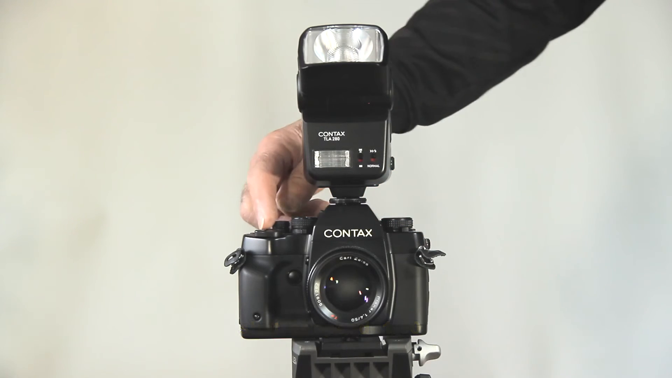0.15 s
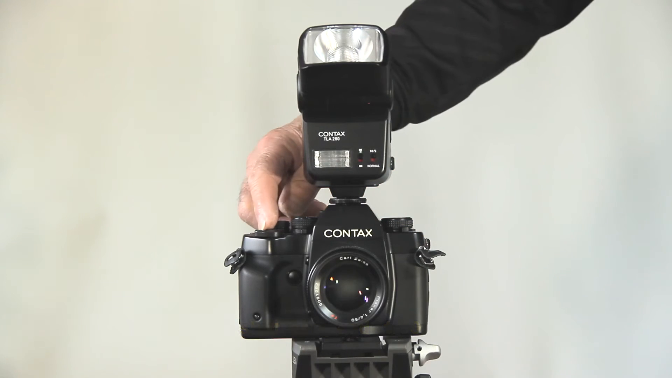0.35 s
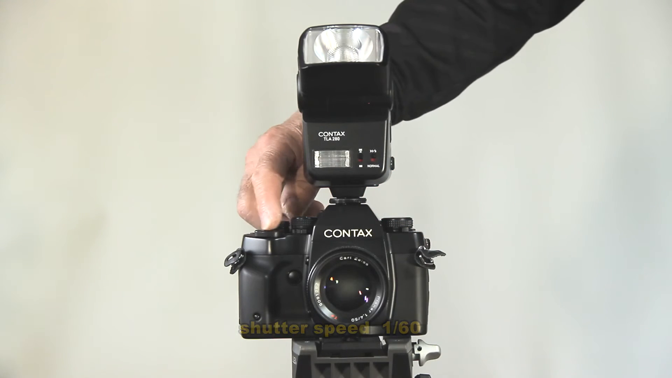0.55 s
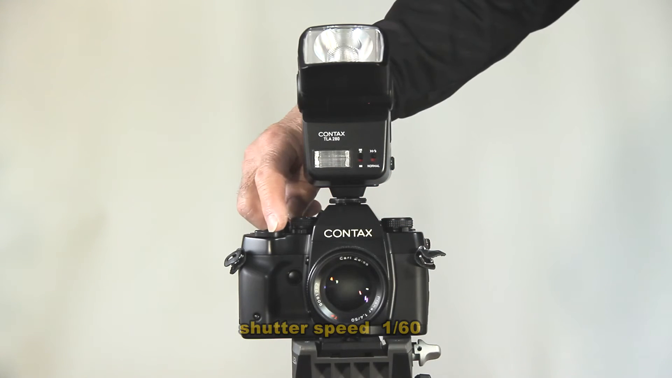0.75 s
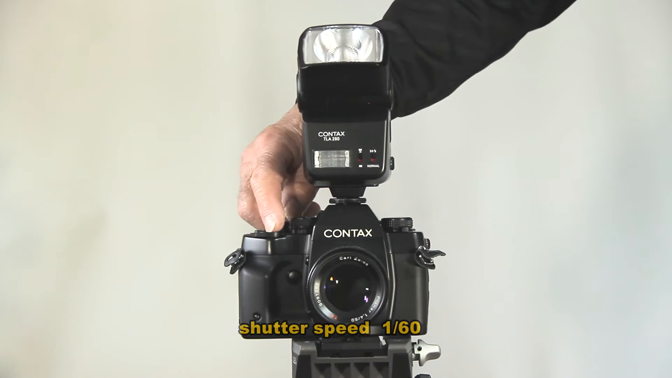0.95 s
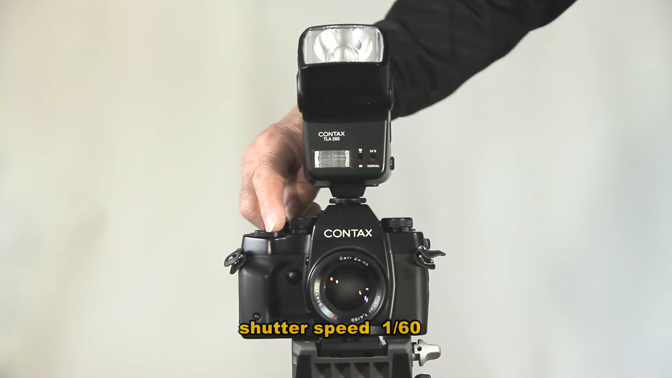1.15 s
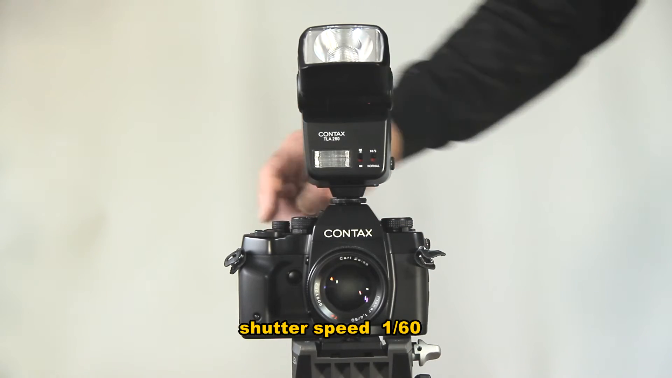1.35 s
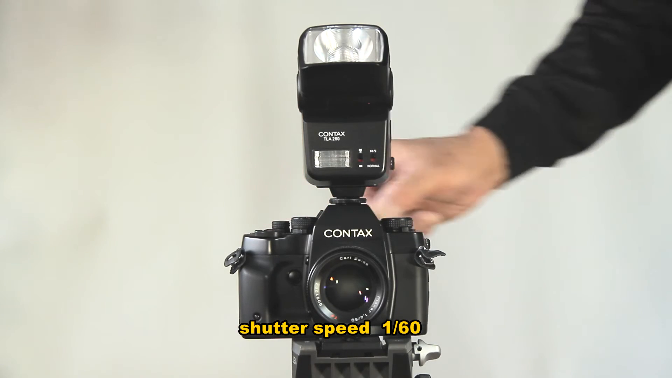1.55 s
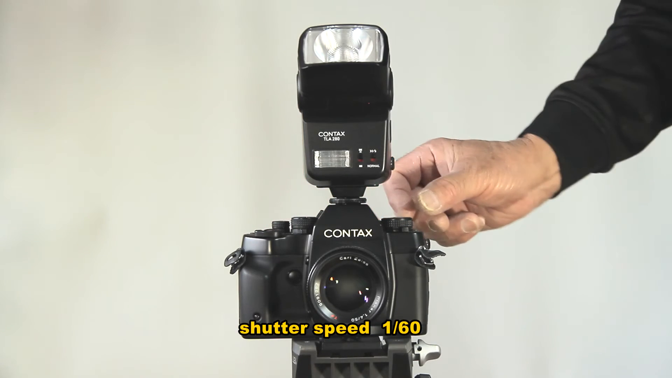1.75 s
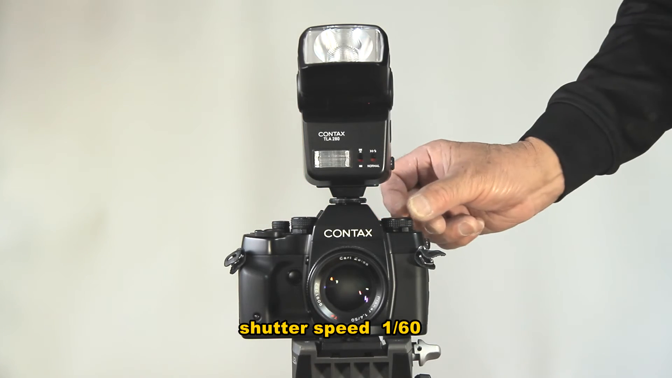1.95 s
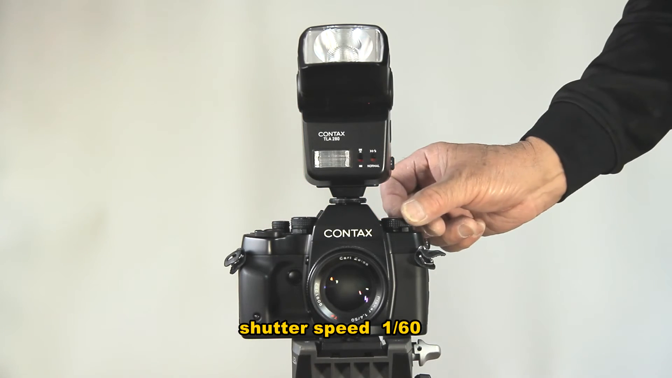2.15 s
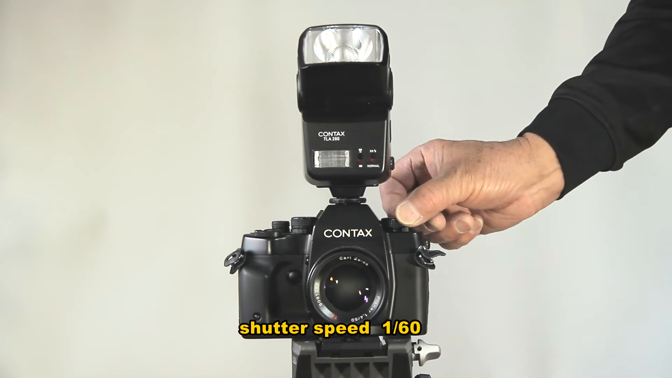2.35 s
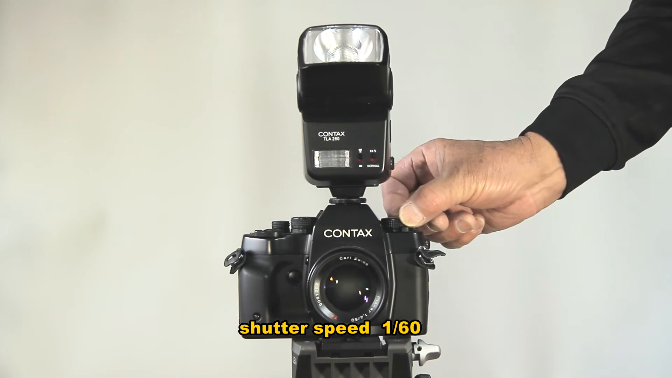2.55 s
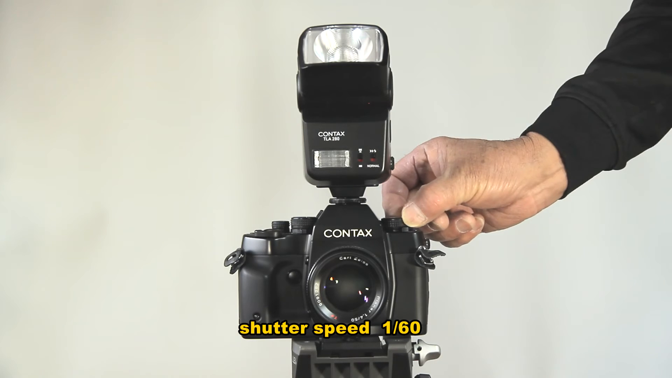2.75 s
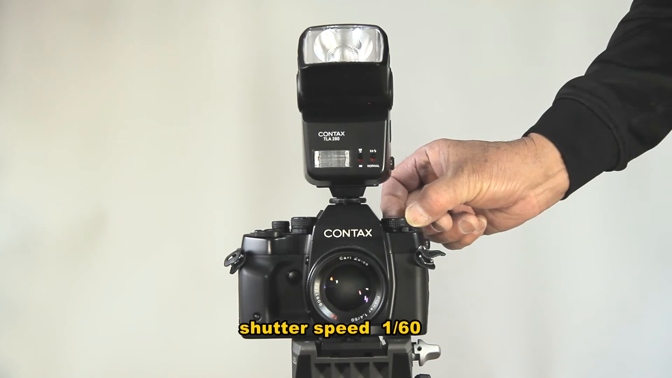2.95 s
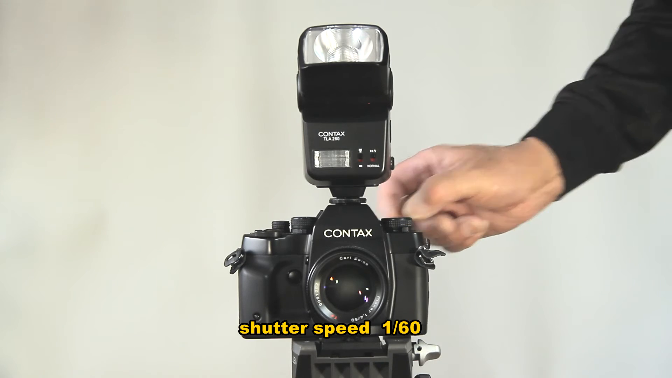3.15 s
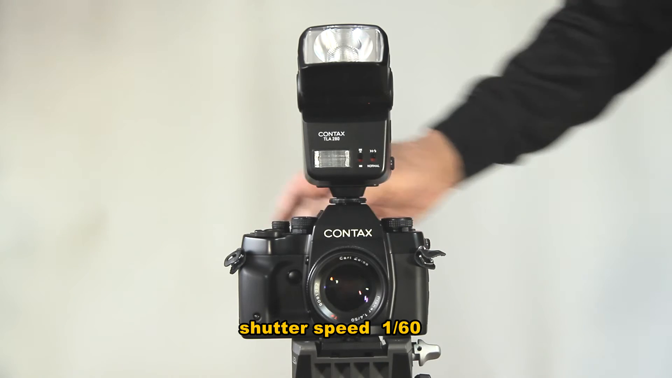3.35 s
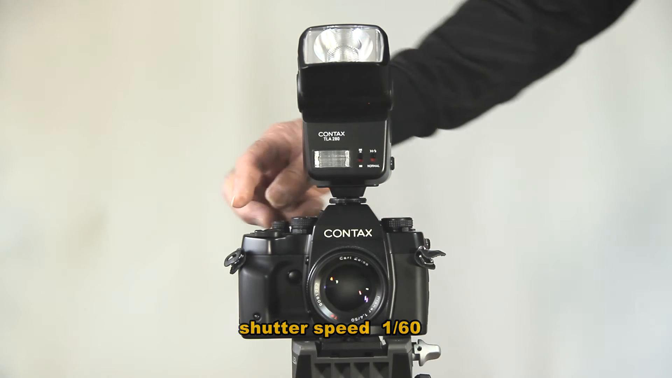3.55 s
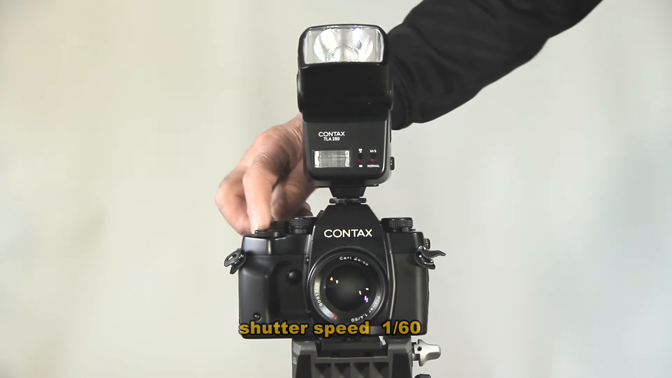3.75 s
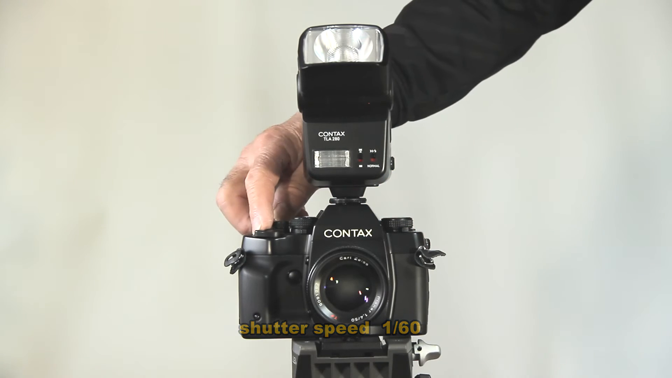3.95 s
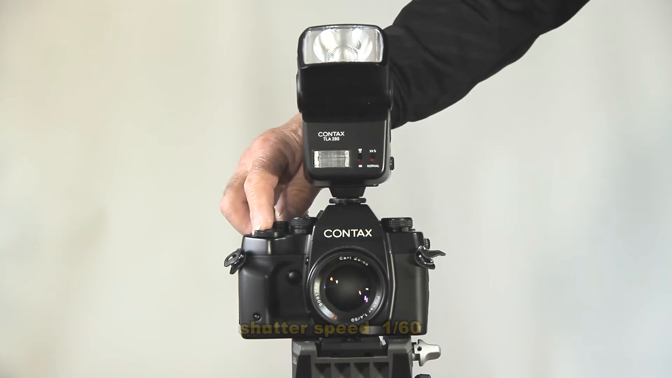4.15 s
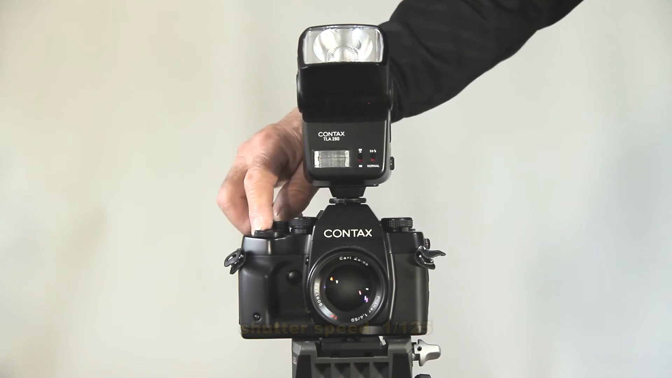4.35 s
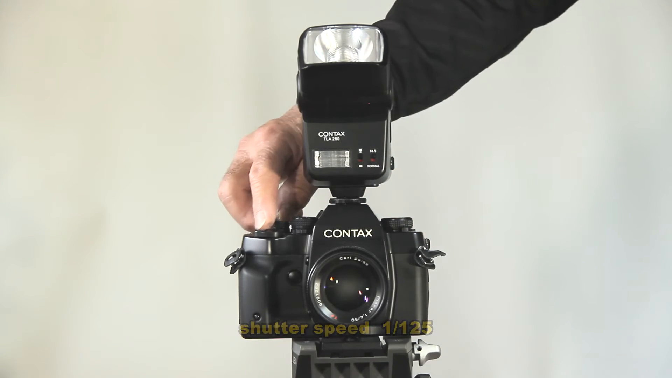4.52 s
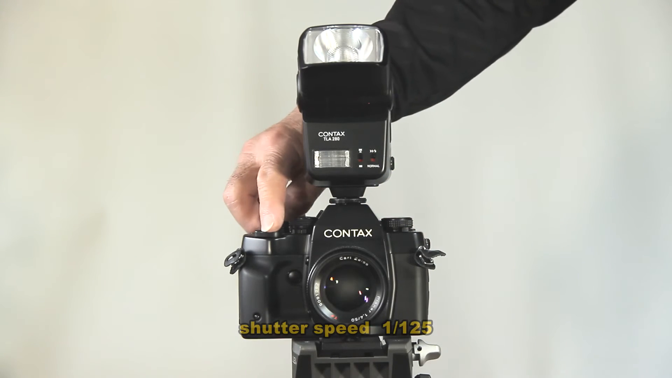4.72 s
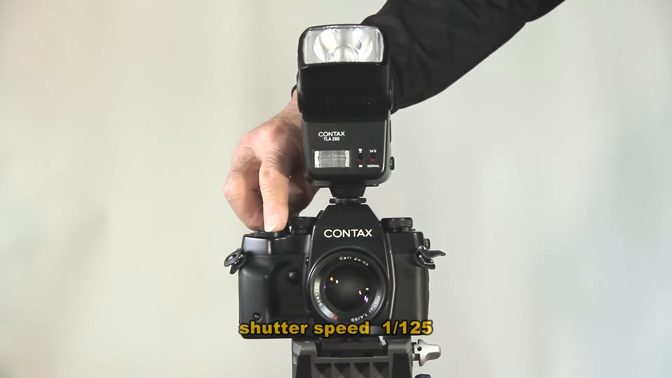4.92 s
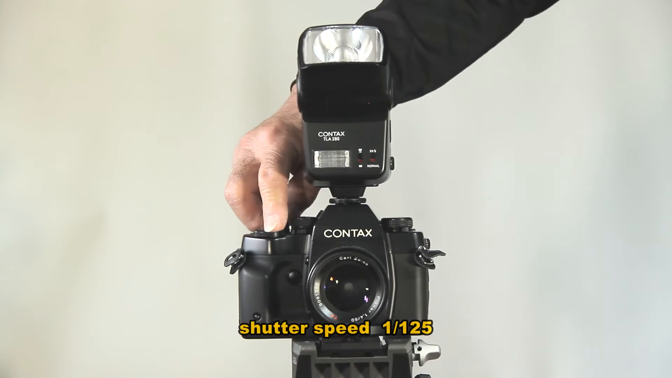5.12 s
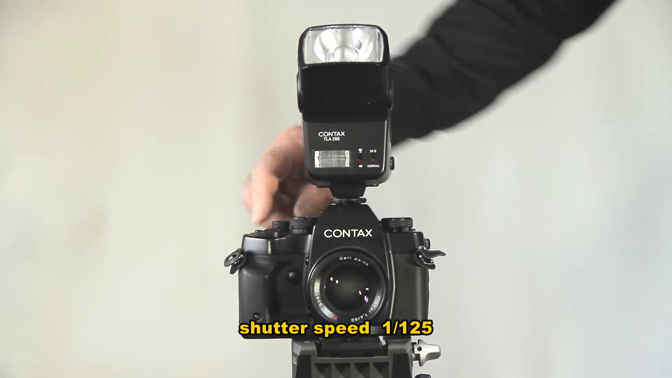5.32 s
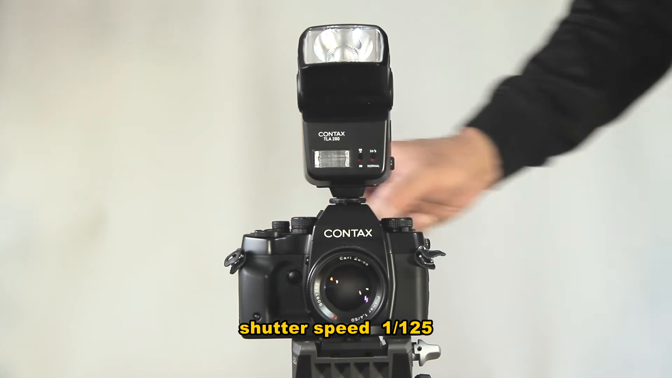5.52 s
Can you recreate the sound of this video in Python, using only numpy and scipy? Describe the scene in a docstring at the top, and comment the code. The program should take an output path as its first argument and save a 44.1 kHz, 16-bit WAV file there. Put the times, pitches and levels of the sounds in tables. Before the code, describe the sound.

In a small room with a firm low mains hum, faint fan tones and soft hiss, faint dial clicks lead to a loud camera shot: snap, mirror slap, shutter clatter and a brief geared motor whine. Quiet clicks and bumps of the hand follow, then a second similar shot. Close microphone, short room echoes.

```python
"""A steady mains hum with fan tones and hiss fills a small room, and a hand clicks the camera's dials.
Then a motor-driven film SLR on a tripod fires, with more clicks before it fires once again.
In each shot the release snaps, the mirror slaps up, the curtains run, the mirror drops and a geared motor
winds the film. Blows are noise bursts with ringing modes, travel is dense ticks, the whine is gear partials.
Soft rubs and bumps of the hand join in, and the room adds short echoes."""
import sys
import numpy as np
from scipy import signal
from scipy.fft import rfft, irfft
from scipy.io import wavfile

SR = 44100
rng = np.random.default_rng(int(sys.argv[2]) if len(sys.argv) > 2 else 0)


def master_out(mix):
    """Clip the mix to full scale and print it as 16-bit PCM to the path in sys.argv[1]."""
    frames = np.transpose(np.atleast_2d(mix))
    ceiling = np.clip(frames, -1, 1)
    pcm = np.round(ceiling * 32767).astype(np.int16)
    wavfile.write(sys.argv[1], SR, pcm)


N = 250488
TIME = np.arange(N) / SR

# When the parts of the camera act. Each row is one shot: the times in seconds of release, mirror up,
# curtain, mirror down and cocking.
SHOTS = [(.872, 0.9164, .9664, 1.0557, 1.079), (4.9202, 4.9613, 5.014, 5.095, 5.124)]
# How hard they act. Each row is one shot: the force in dB of the same five stages.
FORCES_DB = [(0, 0, 3, 2.1, -0.28), (0, 0.52, 1.5, 3, -2.64)]


def amp(db):
    """Turns decibels into gain."""
    return 10 ** (np.asarray(db) / 20)


def unit(x):
    """Scales a sound to rms 1."""
    return x / np.sqrt(np.mean(x ** 2) + 1e-20)


def read(points, hz):
    """Reads a table between its points on a log-frequency axis."""
    f, value = np.transpose(points)
    return np.interp(np.log(hz + 1), np.log(f + 1), value)


def add(mix, s, sound):
    """Mixes a sound in at time s, in seconds."""
    part = mix[round(s * SR):][:len(sound)]
    part += sound[:len(part)]


def tint(x, colour, weight_db=0, corner_hz=3000):
    """Gives x a spectrum, raised or cut by weight_db below the corner, and scales it to rms 1."""
    hz = np.fft.rfftfreq(len(x), 1 / SR)
    shelf_db = weight_db / (1 + (hz / corner_hz) ** 4)
    gain = amp(read(colour, hz) + shelf_db)
    return unit(irfft(rfft(x) * gain, len(x)))


def wander(size, rate_hz):
    """Smooth random motion of rms 1, with little above rate_hz."""
    hz = np.fft.rfftfreq(size, 1 / SR)
    spectrum = rfft(rng.standard_normal(size))
    return unit(irfft(spectrum / (1 + (hz / rate_hz) ** 4), size))


def ticks(size, per_s, spread_db):
    """A dense train of tiny contacts of uneven strength, each a quickly dying puff of noise."""
    strength = amp(spread_db * np.minimum(rng.exponential(1, size), 4)) * rng.choice([-1, 1], size)
    train = strength * (rng.random(size) < per_s / SR)
    scrape = rng.standard_normal(size)
    decay_s = 0.000283  # decay time of the power
    power = signal.lfilter([1], [1, -np.exp(-1 / (decay_s * SR))], train ** 2)
    return scrape * np.sqrt(power)


def crack(colour, weight_db, snap_s, after_db, after_s, size=4096):
    """Hard parts meet: a snap of about a millisecond, then noise, like many close modes, dying fast."""
    t = np.arange(size) / SR
    shape = np.exp(-(t / snap_s) ** 2) + amp(after_db) * np.exp(-t / after_s)
    onset = 1 - np.exp(-t / 0.0001256)
    return tint(rng.standard_normal(size), colour, weight_db) * shape * onset


def cycle(table):
    """Plays a table of one cycle in every shot: yields (s, force in dB, the rest of the row)."""
    # The names of the five stages, in the order in which the shots list them.
    stages = ("release", "mirror up", "curtain", "mirror down", "cocking")
    for times, forces_db in zip(SHOTS, FORCES_DB):
        for stage, delay_s, *rest in table:
            k = stages.index(stage)
            yield times[k] + delay_s, forces_db[k], *rest


def background():
    """Even hiss and rumble from shaped noise, a firm mains hum and fan tones that waver in pitch and level."""
    # Steady tones of the room, mains hum first, then a fan. Each row: frequency in Hz, rms level in dB.
    tones = [(120, -45.5), (151, -58.5), (249, -57), (282, -61), (458, -75), (1200, -59.5), (1404, -61),
             (1696, -61), (2164, -62)]
    # Spectrum of the hiss and rumble. Each row: frequency in Hz, relative level in dB.
    air_colour = [(20, -9), (45, -8.5), (80, -4), (130, -4), (190, -4), (270, -3), (450, -4), (800, -7.5),
                  (1400, -7), (2100, -11), (3000, -13.5), (7000, -19), (14200, -21.5), (14700, -56)]
    (mains_hz, mains_db), *fan = tones
    hum = amp(mains_db) * np.sin(2 * np.pi * mains_hz * TIME)
    for hz, db in fan:
        turns = np.cumsum(hz + 3 * wander(N, rate_hz=9.03)) / SR
        waver = 1 + 0.198 * wander(N, rate_hz=3.96)
        hum += amp(db) * waver * np.sin(2 * np.pi * turns)
    air = amp(-45.5) * tint(rng.standard_normal(N), air_colour)
    return np.sqrt(2) * hum + air  # the root of 2 turns rms levels into sine peaks


def response(size=16384):
    """One path through the room: a few near reflections, and a dense tail whose treble dies first."""
    # How long the tail lasts. Each row: frequency in Hz, time to fall by 60 dB in seconds.
    fall_times = [(200, 0.62), (1000, 0.23), (2000, 0.2606), (5000, 0.2505), (10000, 0.204), (13500, 0.182),
                  (16000, 0.112)]
    # Near surfaces. Each row: delay in seconds, level in dB.
    echoes = [(.0055, -10.5), (.0094, -18.5), (0.019, -10)]
    hz, t, z = signal.stft(rng.standard_normal(size), SR, nperseg=256)
    fade_db = -60 * t / read(fall_times, hz)[:, None]
    tail = signal.istft(z * amp(fade_db), SR, nperseg=256)[1]
    tail *= 1 - np.exp(-(np.arange(len(tail)) / SR / 0.00149) ** 2)  # soft start
    tail /= np.linalg.norm(tail)
    for delay_s, db in echoes:
        add(tail, delay_s * rng.uniform(.97, 1.03), amp([db]))
    return tail


def room(x, count=4):
    """Each part radiates in its own direction, so the paths through the room keep changing."""
    shares = np.array([wander(N, rate_hz=14) for _ in range(count)]) ** 3
    shares /= np.linalg.norm(shares, axis=0)  # keeps the total power even
    return sum(signal.oaconvolve(x * share, response())[:N] for share in shares)


def handling():
    """Skin rubs softly on the button as tiny ticks, and the hand's weight shakes the tripod in soft bumps."""
    # Bumps of the hand on the camera and tripod. Each row: start in seconds, centre frequency in Hz,
    # width in Hz, level in dB before the fades, length in seconds.
    bumps = [(1.934, 563.5, 420, -51, 0.068), (2.619, 71.5, 34, -58, 0.66),
             (2.793, 1532, 900, -44.5, 0.0358), (3.205, 81.63, 40, -61, 0.45)]
    # The fingertip sliding on the release button. Each row: start in seconds, end in seconds,
    # level in dB before the fades.
    rubs = [(0.722, 0.801, -52), (0.842, 0.872, -47.5), (4.887, 4.916, -48.5)]
    # Spectrum of the rubbing. Each row: frequency in Hz, relative level in dB.
    skin_colour = [(200, -4.5), (1200, -2), (3000, 4), (5000, -2), (9000, -12.5), (15000, -19)]
    out = np.zeros(N)
    for s, hz, width_hz, db, length_s in bumps:
        t = np.arange(0, length_s, 1 / SR)
        shake = wander(SR, rate_hz=width_hz / 2)[:len(t)] * np.sin(2 * np.pi * hz * t)
        add(out, s, amp(db) * unit(shake) * np.hanning(len(t)))
    for start, end, db in rubs:
        size = round((end - start) * SR)
        rub = tint(ticks(size, per_s=830, spread_db=0), skin_colour)
        add(out, start, amp(db) * rub * signal.windows.tukey(size, .4))
    return out


def dials():
    """Small detent clicks and finger taps: short cracks, each coloured by the part that is touched."""
    # Fingers on the dials and buttons. Each row: start in seconds, level in dB,
    # weight in dB (lift below 3 kHz), resonance of the touched part in Hz.
    clicks = [(0.199, -35, 7.5, 5970), (0.223, -40, -2, 4500), (0.4334, -40, 13, 3500),
              (1.6332, -36.5, 8, 3520), (1.786, -40, 7.5, 6000), (1.796, -36.5, 3.5, 3000),
              (2.807, -37.5, 4.5, 9300), (2.816, -40.5, 6.5, 9300), (3.0439, -32.5, 2, 11000),
              (3.1355, -25, 3.5, 12250), (3.3093, -32.5, 13, 4320), (3.3129, -30, -7.5, 12450),
              (3.6228, -41.5, -5.5, 9000), (3.7733, -38, 10.5, 3800), (4.2661, -38.5, 6, 4800),
              (4.5736, -32.5, 8, 4820)]
    # Spectrum shared by the clicks. Each row: frequency in Hz, relative level in dB.
    dial_colour = [(100, -9), (500, -3), (1500, -2), (4200, 1.5), (6500, 0), (8500, -2), (12000, -2),
                   (14500, -9), (16000, -27)]
    part_peak_db, part_octaves = 7.5, .3  # height and half-width of the part's resonance
    out, hz = np.zeros(N), np.geomspace(100, 16000, 80)
    for s, db, weight_db, part_hz in clicks:
        octaves = np.log2(hz / part_hz)
        colour = read(dial_colour, hz) + part_peak_db * np.exp(-(octaves / part_octaves) ** 2)
        points = np.column_stack([hz, colour])
        click = crack(points, weight_db, snap_s=0.001313, after_db=-9.5, after_s=0.0077)
        add(out, s, amp(db) * click)
    return out


def springs():
    """Narrow, slightly unsteady rings of springs and plates: sines with a wandering pitch that die away."""
    # The mirror spring hums low when jolted. Each row: stage, delay in seconds, frequency in Hz,
    # relative level in dB, time to fall by 60 dB in seconds.
    mirror_spring = [("curtain", 0.004085, 378, -28.5, 0.072), ("mirror down", 0.0011, 389.3, -32, 0.039)]
    # Small parts set singing as the shutter is cocked. Each row: start in seconds, frequency in Hz,
    # relative level in dB, time to fall by 60 dB in seconds.
    small_parts = [(1.079, 2368, -4.5, 0.0313), (1.083, 5620, -4.5, 0.0716), (1.084, 5400, -9.5, 0.118),
                   (1.082, 2825, -19, 0.084), (1.09, 1795, -12.5, 0.083), (5.12, 2910, -10, 0.078),
                   (5.123, 3020, -19, 0.082), (5.125, 3485, -11.5, 0.065)]
    out, t = np.zeros(N), np.arange(SR // 4) / SR
    jolts = [(s, hz, db + force_db, t60) for s, force_db, hz, db, t60 in cycle(mirror_spring)]
    for s, hz, db, t60 in jolts + small_parts:
        turns = np.cumsum(hz * (1 + 0.0252 * wander(len(t), rate_hz=730))) / SR
        level = amp(db - 60 * t / t60) * (1 - np.exp(-t / 0.00061))
        add(out, s, level * np.sin(2 * np.pi * turns))
    return out


def levers():
    """Aperture linkage and curtains start abruptly and chatter, as dense ticks, while they travel."""
    # Runs of the levers, springs and curtains in one cycle. Each row: stage, delay in seconds,
    # level in dB before the stage's force, length in seconds, change over the run in dB.
    runs = [("release", 0.00099, -24, .043, 2.93), ("mirror up", 0, -13.5, .085, -7.5),
            ("curtain", .027, -34.5, .05, -11)]
    # Spectrum of the chatter. Each row: frequency in Hz, relative level in dB.
    chatter_colour = [(60, -24), (400, -13.5), (750, -20.5), (1200, -13), (1800, -1), (2400, -3.5),
                      (3600, 0.5), (5500, -2.5), (7500, -3), (10300, 0.5), (13000, 2), (16000, -7.5)]
    out = np.zeros(N)
    for s, force_db, db, length_s, fade_db in cycle(runs):
        size = round(length_s * SR)
        level = amp(force_db + db + np.linspace(0, fade_db, size)) * signal.windows.tukey(size, .04)
        add(out, s, level * tint(ticks(size, per_s=1300, spread_db=1.5), chatter_colour))
    return out


def eased(t):
    """The load comes off around t = 0: a smooth step from 0 to 1."""
    ease_s = 0.0194  # how gradually the load comes off
    return .5 + .5 * np.tanh(t / (2 * ease_s))


def winder():
    """The motor spins up, strains, eases and briefly coasts: gear teeth whine, and rattle with the shaft."""
    # One run a shot. Each row: start in seconds, time the load eases in seconds, cut-off in seconds,
    # mesh pitch (teeth meeting per second) under load in Hz, the same running free in Hz, relative
    # whine level in dB, overtone level under load in dB, overtone level running free in dB.
    winds = [(1.008, 1.175, 1.2337, 1799, 1973, -22, -9.5, -4),
             (5.052, 5.183, 5.277, 1725, 1821, -24, -3, -2.5)]
    # Partials of the whine; the shaft turns once in four teeth. Each row: multiple of the mesh pitch,
    # relative level in dB.
    partials = [(.25, -23.5), (.75, -31), (1, 3.5), (1.25, -16.5), (2, -1), (3, -7), (4, -10.5), (5, -19)]
    # Spectrum of the rattle. Each row: frequency in Hz, relative level in dB.
    rattle_colour = [(60, -19.5), (420, -17.5), (750, -10.5), (1200, -6.5), (1600, 3.5), (2300, 4.5),
                     (3500, 2.5), (4600, -1.5), (5800, 0), (7800, -3), (10000, 4.5), (12500, 4),
                     (16000, -3.5)]
    start_sag, spin_up_s = .34, .025  # the motor starts this share below speed and catches up
    # the gears rattle hardest while they cock the shutter
    rattle_base_db, strain_db, strain_s = -23.5, 9.5, 0.021
    # after the cut-off: time left, share of speed lost and fades over that time
    coast_s, coast_sag, coast_whine_db, coast_rattle_db = .02, 0.01, -17, -41
    # the gear case resonates here: low partials swell as the mesh pitch passes through
    case_hz, case_width_hz = 1885.6, 163
    whine, rattle = np.zeros(N), np.zeros(N)
    for run, (*_, cocking_s), (*_, force_db) in zip(winds, SHOTS, FORCES_DB):
        start, ease_s, cut_s, loaded_hz, free_hz, whine_db, loaded_db, free_db = run
        t = np.arange(start, cut_s + coast_s, 1 / SR)
        free = eased(t - ease_s)
        coast = np.maximum(t - cut_s, 0) / coast_s
        spin = 1 - start_sag * np.exp((start - t) / spin_up_s) - coast_sag * coast
        hz = (loaded_hz + (free_hz - loaded_hz) * free) * spin
        teeth = np.cumsum(hz * (1 + 0.00798 * wander(len(t), rate_hz=167.5))) / SR

        case_db = -10 * np.log10(1 + (2 * (hz - case_hz) / case_width_hz) ** 2)
        overtone_db = loaded_db + (free_db - loaded_db) * free
        tone = np.zeros(len(t))
        for multiple, db in partials:
            shape_db = overtone_db if multiple > 1.5 else case_db
            level = amp(db + shape_db + 3.64 * wander(len(t), rate_hz=188))
            tone += level * np.sin(2 * np.pi * (multiple * teeth + rng.random()))
        add(whine, start, amp(whine_db + coast_whine_db * coast) * spin ** 2 * tone)

        strain = np.exp(-((t - cocking_s) / strain_s) ** 2)
        rattle_db = rattle_base_db + (strain_db + force_db) * strain + coast_rattle_db * coast
        shaft = np.cos(np.pi * teeth / 2)
        contacts = ticks(len(t), per_s=3500, spread_db=3.0) * (1 + 0.285 * shaft)
        add(rattle, start, amp(rattle_db) * tint(contacts, rattle_colour))
    return whine, rattle


def blows(count=4):
    """Parts strike their stops and bounce: each hit is a crack and rings the body a little differently."""
    # The blows of one cycle. Each row: stage, delay in seconds, level in dB before the stage's force,
    # weight in dB (extra low-middle from heavy parts), relative ring of the body in dB,
    # time to the first bounce in seconds, change per bounce in dB.
    strikes = [("release", 0, -11, -17, 3.55, .0045, -7), ("mirror up", 0, -7, -1.14, -5.5, .0045, -2.75),
               ("curtain", -.0085, -9.5, -2, 1, 0.0027, -14), ("curtain", 0, -9.5, 0.98, 0.5, .003, -13.5),
               ("curtain", .0215, -19.5, 4.6, -3, .009, -4.5),
               ("mirror down", -.0057, -18, -6, 5.3, 0.0026, -13.5),
               ("mirror down", 0, -5.5, 11.6, -1, .0075, -9.5),
               ("cocking", -.0085, -8.5, -1, -10.5, .003, -6), ("cocking", 0, -2, -2, -5, .002, -2.17),
               ("cocking", .01, -12.5, -1.95, -11, .004, -1)]
    # Spectrum of the cracks. Each row: frequency in Hz, relative level in dB.
    crack_colour = [(60, -26), (350, -15), (750, -43), (1500, -12.5), (2500, -0.5), (4200, 1.5),
                    (7000, 3.5), (10000, 7), (13000, 4), (16000, -9.5)]
    # Modes of the camera body. Each row: frequency in Hz, relative level in dB,
    # time to fall by 60 dB in seconds.
    modes = [(520, -31.5, 0.093), (1065.5, -23.5, 0.089), (1426, -18.5, 0.107), (1711, -18, 0.065),
             (2189, -34.5, 0.073), (2970, -32.5, .06), (4219, -7.5, 0.0208), (4754, -12, 0.0213),
             (5655, -8.5, 0.047), (10000, -12, 0.042), (12400, -29, .04)]
    bounce_shrink = .8  # each bounce takes this share of the time of the one before
    out, t = np.zeros(N), np.arange(SR // 5) / SR
    for s, force_db, first_db, weight_db, ring_db, gap_s, bounce_db in cycle(strikes):
        for bounce in range(count):
            db = force_db + first_db + bounce * min(bounce_db, 0)
            ring = np.zeros(len(t))
            for hz, mode_db, t60 in modes:
                detune = 1 + .015 * rng.standard_normal()
                ring += amp(mode_db - 60 * t / t60) * np.sin(2 * np.pi * (hz * detune * t + rng.random()))
            snap = crack(crack_colour, weight_db, snap_s=0.000989, after_db=-11.5, after_s=0.00935)
            add(out, s, amp(db) * snap)
            add(out, s, amp(db + ring_db - 6.5) * ring)
            s += gap_s * bounce_shrink ** bounce
    return out


def scene():
    """Mixes the camera, the hand, their echo in the room and the background."""
    whine, rattle = winder()
    whine = amp(-0.5) * whine
    camera = blows() + levers() + rattle + amp(-3.0) * springs()
    # the small body radiates little below 80 Hz
    bass_cut = signal.butter(2, 80, "high", fs=SR, output="sos")
    camera = signal.sosfilt(bass_cut, camera)
    hand = dials() + handling()
    echo = room(amp(-2.5) * camera + amp(-5.5) * whine + hand)
    return (camera + whine + hand + echo + background())[None]


def record(dry, ceiling=1.0):
    """Overload rounds off the loudest peaks; then a filter removes what lies above the band limit."""
    edge_hz = 15800
    rounded = dry / (1 + (dry / ceiling) ** 6) ** (1 / 6)
    low_pass = signal.firwin(511, edge_hz, window=("kaiser", 9), fs=SR)
    return signal.oaconvolve(rounded, low_pass[None], "same")


dry = scene()
out = record(dry)
master_out(out)
```